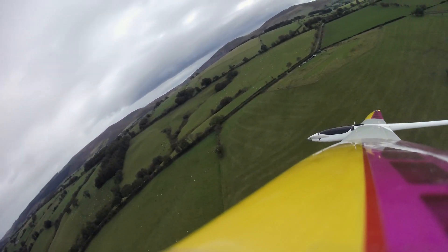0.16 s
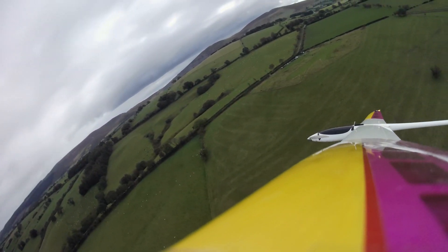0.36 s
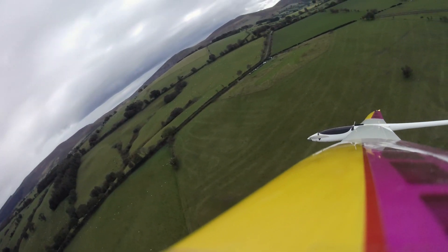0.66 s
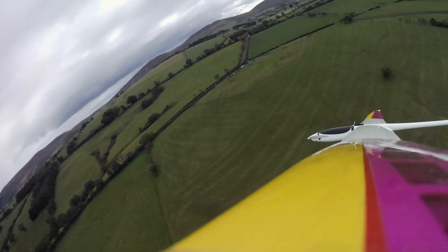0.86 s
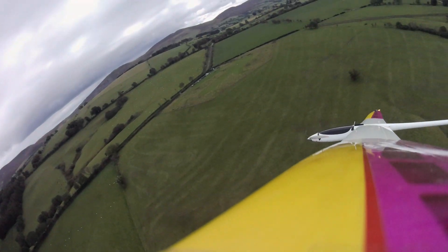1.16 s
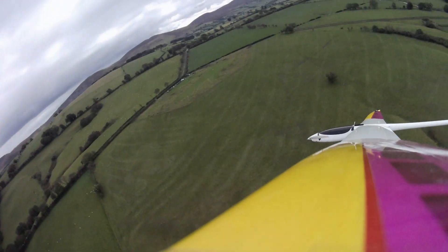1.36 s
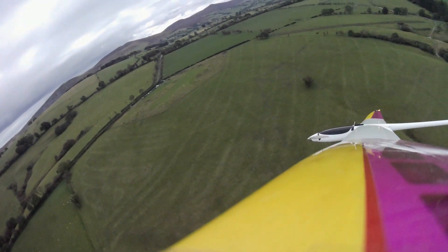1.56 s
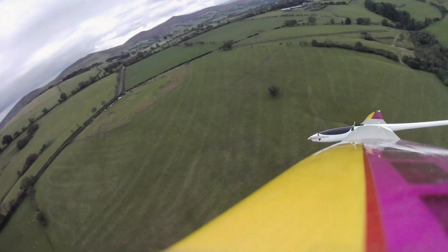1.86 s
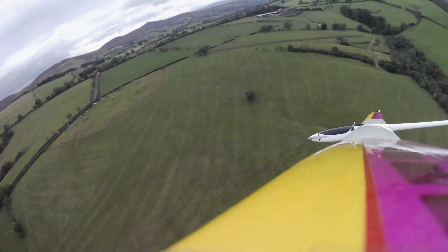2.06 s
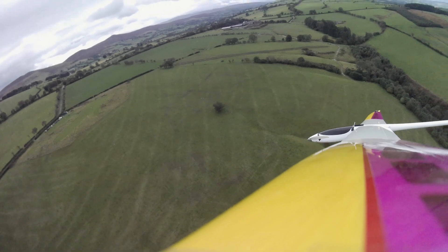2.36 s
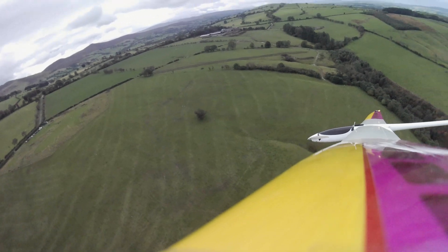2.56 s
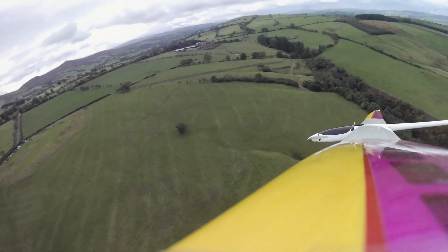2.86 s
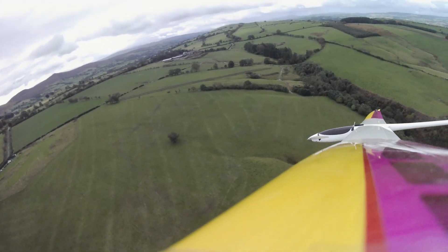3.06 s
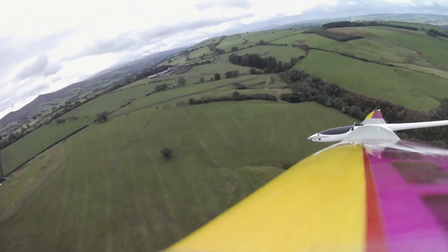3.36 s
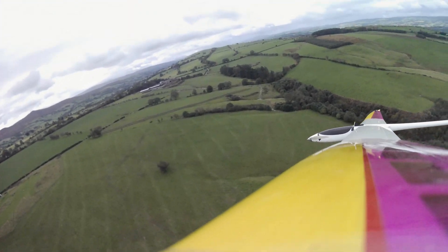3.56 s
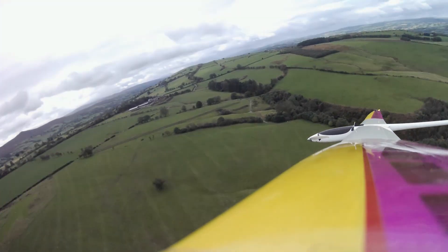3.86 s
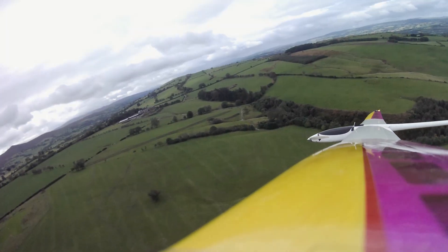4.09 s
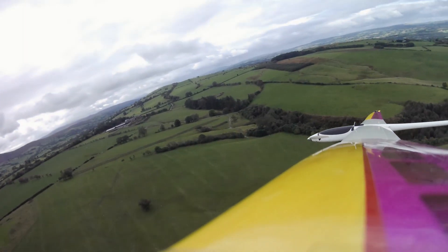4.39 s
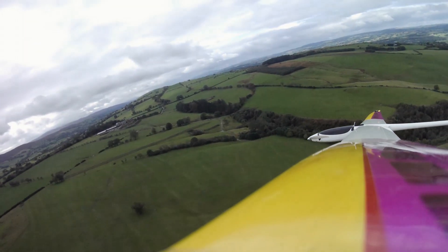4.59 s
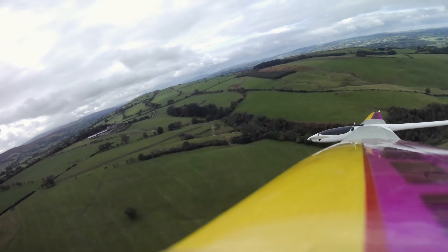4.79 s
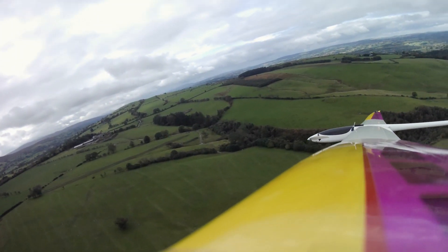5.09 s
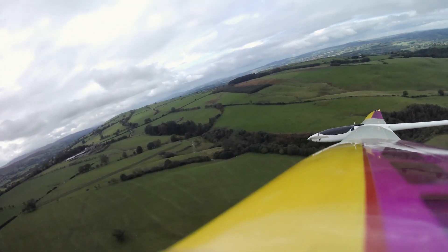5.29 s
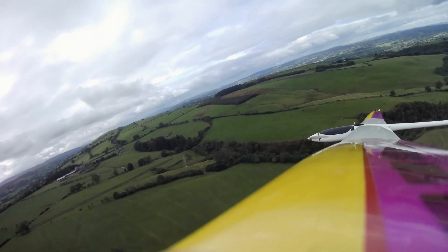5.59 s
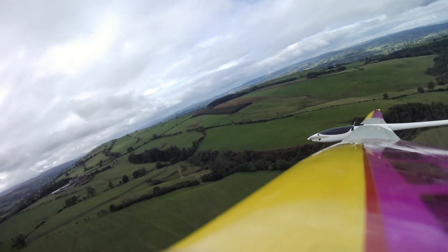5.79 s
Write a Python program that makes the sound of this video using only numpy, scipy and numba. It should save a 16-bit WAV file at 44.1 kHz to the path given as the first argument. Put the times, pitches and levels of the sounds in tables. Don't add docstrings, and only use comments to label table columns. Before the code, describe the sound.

Only wind is heard, very close, at a microphone mounted on a model glider's wing. Low buffeting and a broad rush start moderately, ease slightly around one second, then grow as the glider speeds up in a turn. Hiss brightens, deep thumps hit harder between about three and five seconds, and the roar finally eases a little.

```python
import sys
import numpy as np
from scipy import signal
from scipy.fft import rfft, irfft, next_fast_len
from scipy.io import wavfile
from scipy.ndimage import uniform_filter1d
from numba import njit

SR = 44100
rng = np.random.default_rng(int(sys.argv[2]) if len(sys.argv) > 2 else 0)


def attenuation_scalar(level_db):
    decades = np.asarray(level_db, float) / 20
    return 10 ** decades


def to_wav(s):
    ch = np.atleast_2d(s).T
    pcm = np.round(np.clip(ch, -1, 1) * 32767)
    wavfile.write(sys.argv[1], SR, pcm.astype(np.int16))


N = 261954


def level(x, db):
    return x * attenuation_scalar(db) / np.sqrt(np.mean(x ** 2))


def steady(x, seconds):
    power = uniform_filter1d(x ** 2, int(seconds * SR))
    return level(x / np.sqrt(power), 0)


def coloured(gain):
    size = next_fast_len(N)
    hz = np.maximum(np.arange(size // 2 + 1) * SR / size, 1)
    return irfft(rfft(rng.standard_normal(size)) * gain(hz), size)[:N]


def walk(rate):
    hold = int(SR / rate)
    steps = np.repeat(rng.standard_normal(N // hold + 1), hold)
    wander = uniform_filter1d(uniform_filter1d(steps, hold), hold)[:N]
    wander = wander - uniform_filter1d(wander, 4 * hold)
    return wander / wander.std()


@njit
def moving_filter(x, hz, width):
    out = np.empty((3, len(x)))
    band_state, low_state = 0., 0.
    for i in range(len(x)):
        g, damping = np.tan(np.pi * hz[i] / SR), width[i] / hz[i]
        band = (band_state + g * (x[i] - low_state)) / (1 + g * (g + damping))
        low = low_state + g * band
        out[0, i] = low
        out[1, i] = damping * band
        out[2, i] = x[i] - damping * band - low
        band_state, low_state = 2 * band - band_state, 2 * low - low_state
    return out


def between(slow, fast, speed):
    return slow + (fast - slow) * speed


# time in seconds, airspeed in m/s.
AIRSPEED = [(0, 12), (.9, 11.4), (1.2, 12.8), (1.7, 14.8), (2.2, 17.4), (2.8, 18.56), (3.3, 20.2),
            (3.8, 21.96), (4.5, 21.55), (5.0, 20.14), (5.5, 19.6), (5.94, 18.1)]


def airspeed_db(t):
    full_speed_m_s = 28
    return 10 * np.log10(np.interp(t, *np.transpose(AIRSPEED)) / full_speed_m_s)


# frequency in Hz, level in dB per Hz.
BIG_EDDIES = [(10, -24), (22, -0.5), (45, -0.5), (80, -5), (130, -7.5), (200, -15.5), (320, -19)]


def buffeting():
    hz, db = np.transpose(BIG_EDDIES)
    push = coloured(lambda f: attenuation_scalar(np.interp(np.log(f), np.log(hz), db, left=-60, right=-90)))
    return steady(push, seconds=0.11)


def rush(speed):
    top_hz = between(309, 553, speed) * (1 + 0.02 * walk(6))
    eddies = moving_filter(rng.standard_normal(N), top_hz, 1.47 * top_hz)[0] / np.sqrt(top_hz)
    low_hz = np.full(N, 145.)
    eddies = moving_filter(eddies, low_hz, 0.97 * low_hz)[2]
    flicker_db = 1.25 * walk(35)
    return steady(eddies, seconds=0.21) * attenuation_scalar(flicker_db)


def port(speed):
    hz = between(2315, 2270, speed) * (1 + 0.023 * walk(12))
    width_hz = between(320, 1120, speed)
    tone = moving_filter(rng.standard_normal(N), hz, width_hz)[1]
    tone = moving_filter(tone, hz, 3.25 * width_hz)[1] / np.sqrt(width_hz)
    flicker_db = 0.64 * walk(14)
    return level(tone, 0) * attenuation_scalar(flicker_db)


# frequency in Hz, level in dB per Hz,
# share (a ratio) of the speed swell it follows.
FINE = [(540, -11, 0.26), (1100, -4.5, 0.59), (1840, -4, 0.52), (2790, -1.5, 0.52), (4270, -5.5, 0.88),
        (5320, -3, .8), (5760, -12, 1.1), (7040, -41, 1), (8330, -21.5, 1.26), (8330, -16, 1.),
        (10640, -15.5, 1.43), (11840, -27, 1.24), (13070, -26, 1.), (13700, -50.5, 1.2)]


def hiss(swell_db):
    hz, db, share = np.transpose(FINE)

    def shape(f):
        return attenuation_scalar(np.interp(np.log(f), np.log(hz), db, right=db[-1] - 7.0, left=-80))

    out, puffs = 0, walk(18)
    for centre in 500 * 2 ** (np.arange(11) / 2):
        def overlap(f):
            octaves = np.clip(np.log2(f / centre), -0.5, 0.5)
            return np.cos(np.pi * octaves)

        band = coloured(lambda f: shape(f) * overlap(f))
        follow = np.interp(np.log(centre), np.log(hz), share)
        fineness = min(centre / 11000, 1) ** 2
        flicker_db = fineness * 0.98 * puffs + 0.4 * walk(16)
        out = out + band * attenuation_scalar(follow * swell_db + flicker_db)
    return level(out, -36)


# time in seconds, peak level in dB, swing frequency in Hz.
THUMPS = [(0.071, -18.5, 35.0), (0.329, -11, 37.7), (0.498, -11.5, 45), (1.379, -13, 40.4),
          (1.898, -11, 59.2), (2.279, -18, 45.8), (2.468, -9.5, 43.1), (2.779, -8.5, 64), (3.328, -7, 61.9),
          (3.52, -4, 45.8), (3.599, -8, 37.7), (3.634, -7, 32.3), (3.877, -7, 52), (4.002, -14, 86.1),
          (4.119, -4, 50), (4.722, -6, 61.9), (5.112, -2, 43.1), (5.269, -12, 45.8), (5.611, -15, 88.8)]


def thumps(small):
    t, out, cover = np.arange(N) / SR, np.zeros(N), np.ones(N)
    for start, db, hz in THUMPS:
        cycles = (t - start - 0.01) * hz
        shape = np.exp(-(cycles / 0.47) ** 2)
        phase_turns = rng.random()
        out += attenuation_scalar(db - 6.0) * shape * np.cos(2 * np.pi * (cycles + phase_turns))
        cover *= 1 - 0.7 * shape
    return small * cover + out


# middle in seconds, length in seconds, strength in dB.
ROUGH_AIR = [(.4, 0.45, 2), (.6, 0.1, -2), (0.79, 0.27, 1.5), (.95, 0.049, 0), (1.202, 0.24, -1.5),
             (1.363, 0.087, 2), (1.75, 0.42, -0.5), (1.966, 0.14, 1), (2.477, 0.06, 3.5), (2.744, 0.32, 1),
             (2.962, 0.055, 0), (3.294, 0.13, 2), (3.548, 0.13, 2.5), (3.934, .2, 2.5), (4.303, 0.2, 2.5),
             (4.644, 0.47, 4), (5.02, 0.075, 0.5), (5.29, 0.3, 1.2), (5.556, 0.081, -0.5),
             (5.74, 0.081, -2)]


def rough_air(t):
    return sum(db * np.exp(-(2 * (t - middle) / length) ** 2) for middle, length, db in ROUGH_AIR)


def scene():
    t = np.arange(N) / SR
    speed_db, rough_db = airspeed_db(t), rough_air(t)
    swell_db = 6 * speed_db
    speed = np.clip(1 + swell_db / 22, 0, 1.1)
    buffet = buffeting() * attenuation_scalar(-20.5 + 2.31 * speed_db + 0.77 * rough_db)
    rushing = rush(speed) * attenuation_scalar(-19.5 + 4.03 * speed_db + 0.91 * rough_db)
    singing = port(speed) * attenuation_scalar(-34 + 2.76 * speed_db + 0.13 * rough_db)
    air = thumps(buffet) + rushing + singing + hiss(swell_db)
    return air[None]


# centre frequency in Hz, width in Hz.
NOTCHES = [(4500, 800), (6525, 2550), (7397, 2000), (8183, 1260), (9808, 1200), (14266, 700)]


def camera_filter(dry):
    lead = 4096
    running = np.pad(dry, ((0, 0), (lead, lead)), mode="reflect", reflect_type="odd")
    size = next_fast_len(N + 2 * lead)
    f = np.arange(size // 2 + 1) * SR / size
    response = 1
    for hz, width in NOTCHES:
        detuning = hz ** 2 - f ** 2
        response = response * detuning / (detuning + 1j * f * width)
    return irfft(rfft(running, size) * response, size)[:, lead:lead + N]


def band_limit(x):
    return signal.sosfilt(signal.butter(12, 15720, fs=SR, output="sos"), x)


def record(dry):
    converter_hiss = attenuation_scalar(-120) * rng.standard_normal(dry.shape)
    return band_limit(camera_filter(dry) + converter_hiss)


dry = scene()
out = record(dry)
to_wav(out)
```